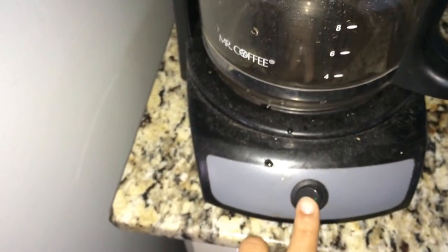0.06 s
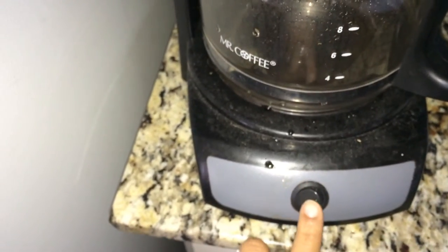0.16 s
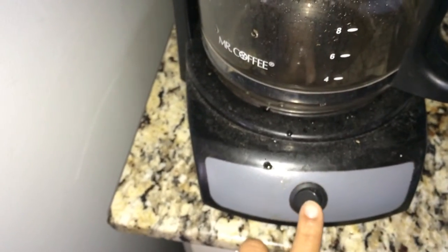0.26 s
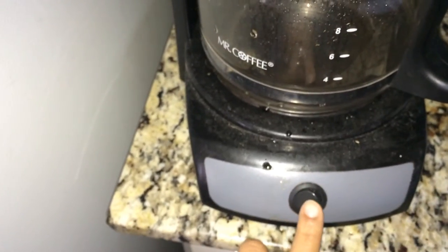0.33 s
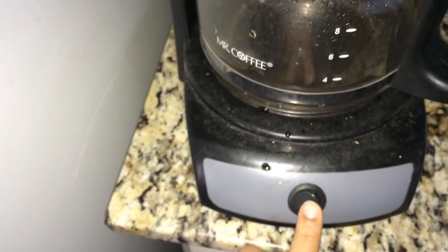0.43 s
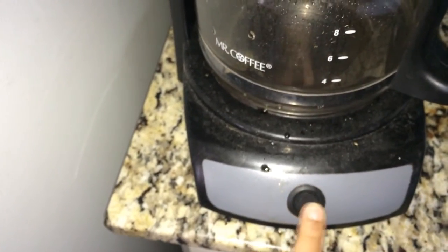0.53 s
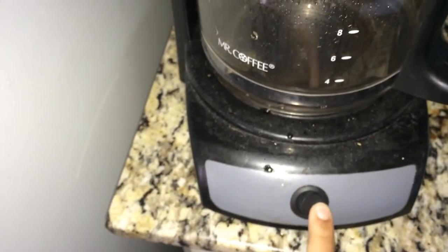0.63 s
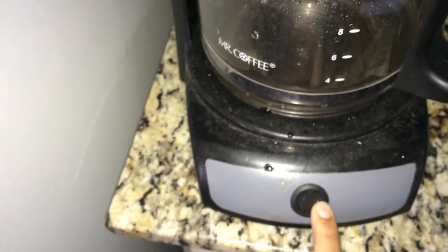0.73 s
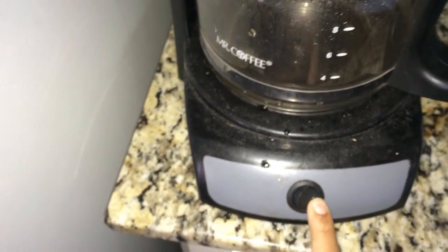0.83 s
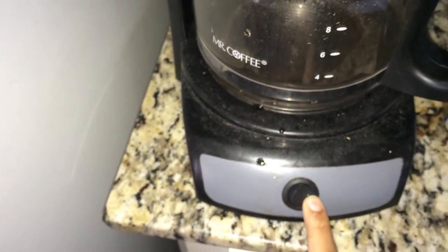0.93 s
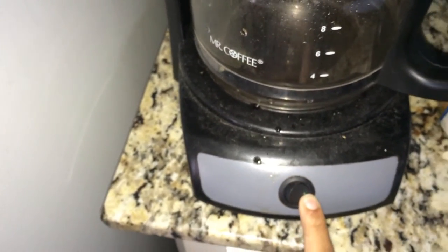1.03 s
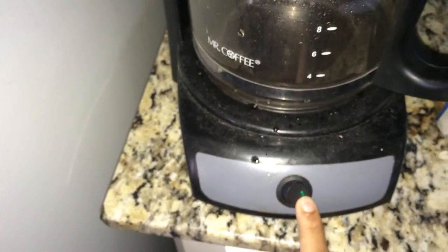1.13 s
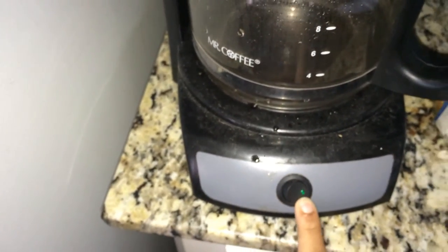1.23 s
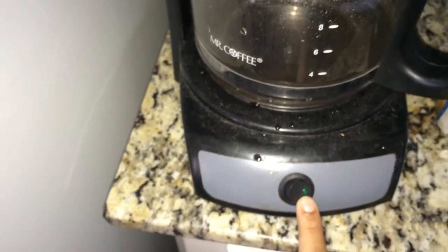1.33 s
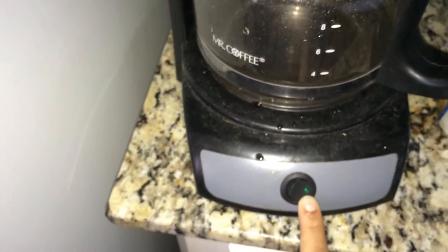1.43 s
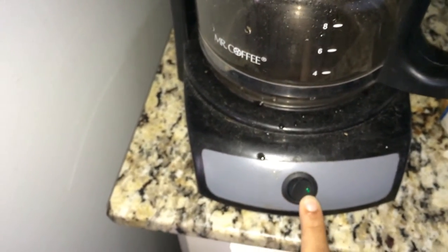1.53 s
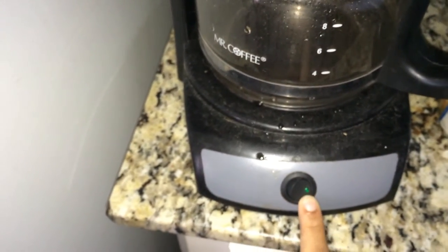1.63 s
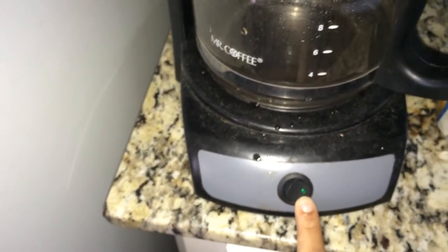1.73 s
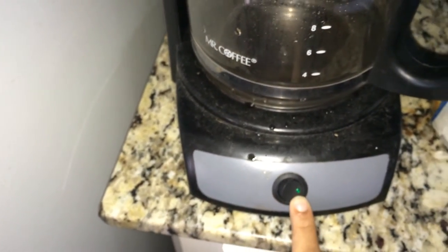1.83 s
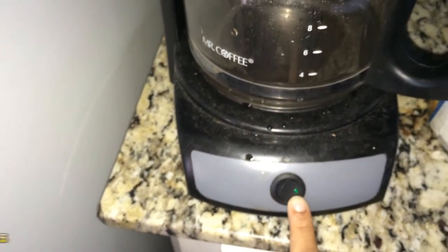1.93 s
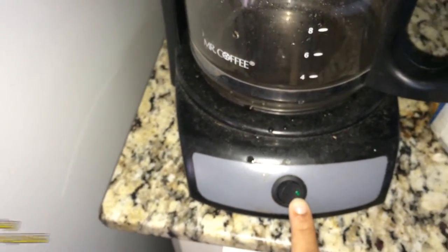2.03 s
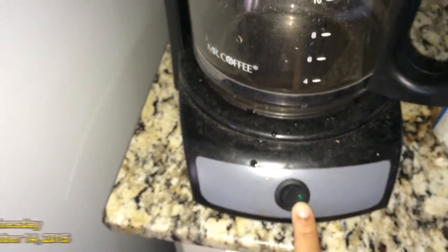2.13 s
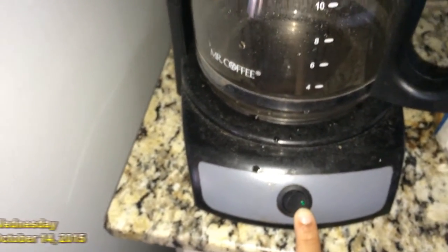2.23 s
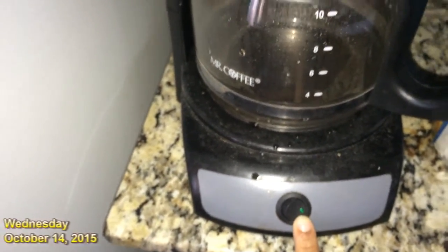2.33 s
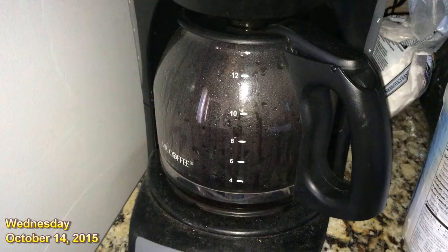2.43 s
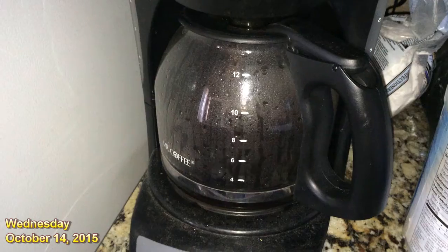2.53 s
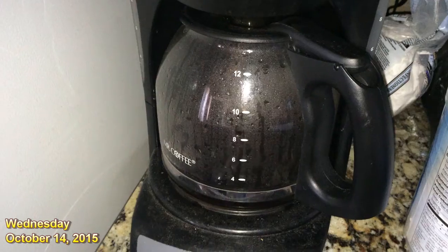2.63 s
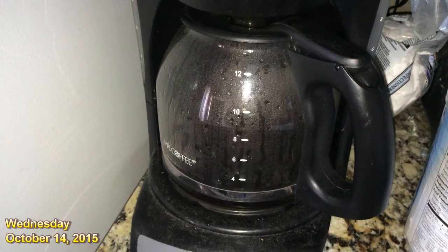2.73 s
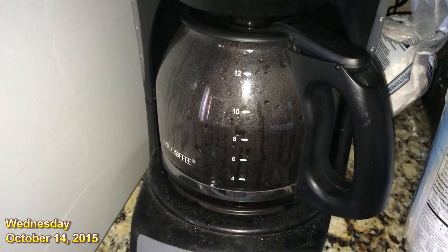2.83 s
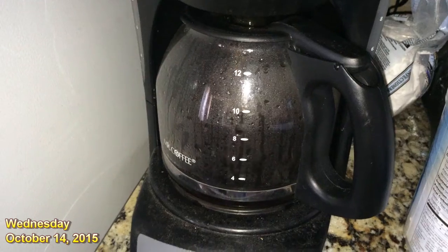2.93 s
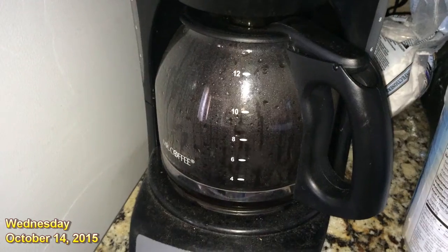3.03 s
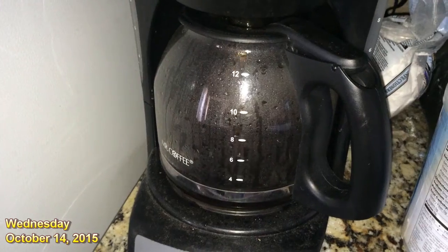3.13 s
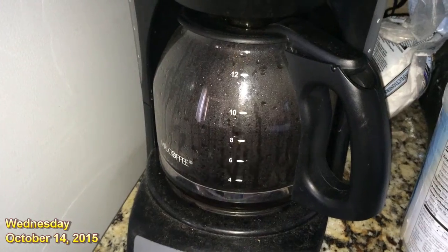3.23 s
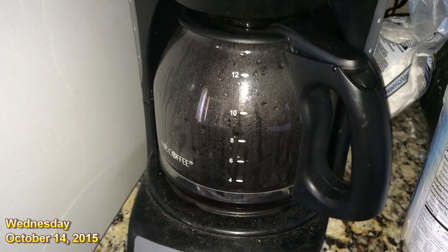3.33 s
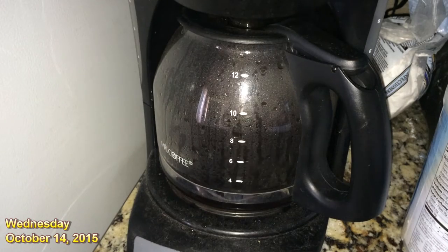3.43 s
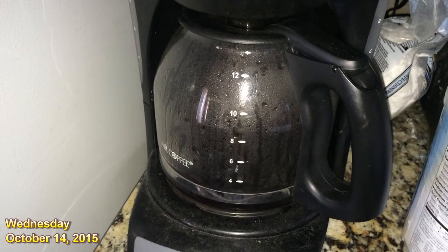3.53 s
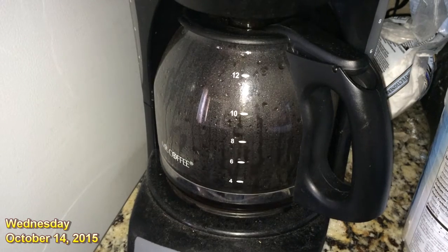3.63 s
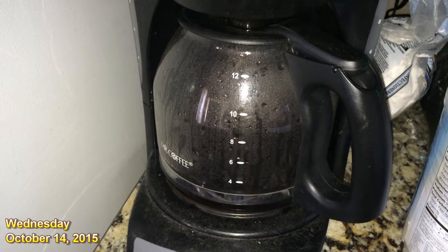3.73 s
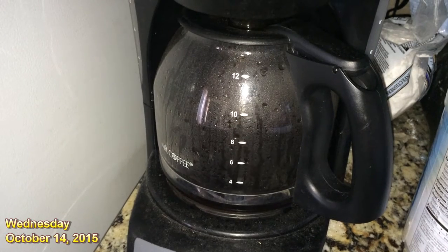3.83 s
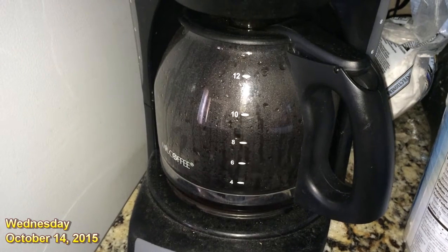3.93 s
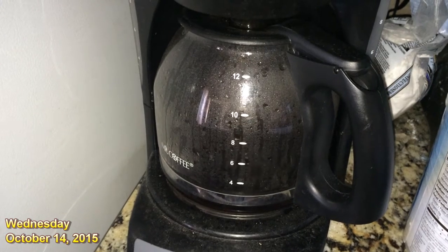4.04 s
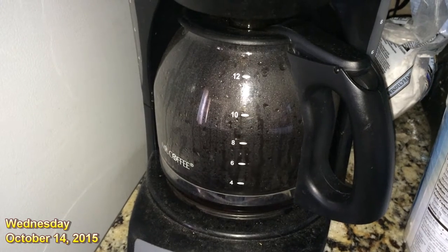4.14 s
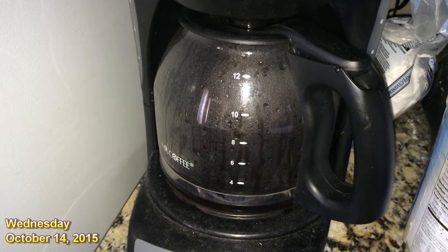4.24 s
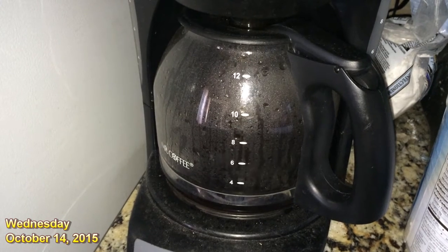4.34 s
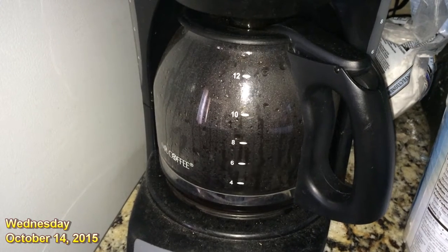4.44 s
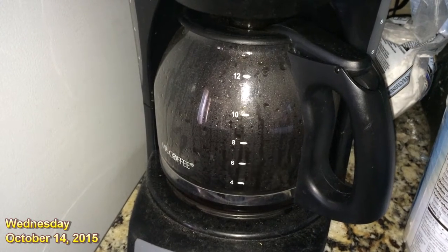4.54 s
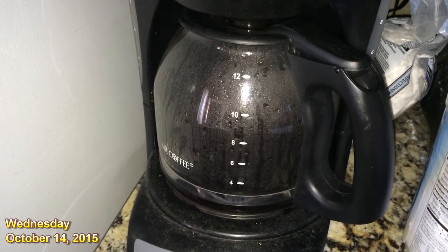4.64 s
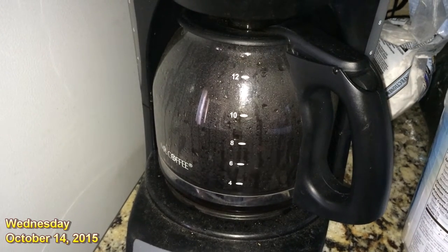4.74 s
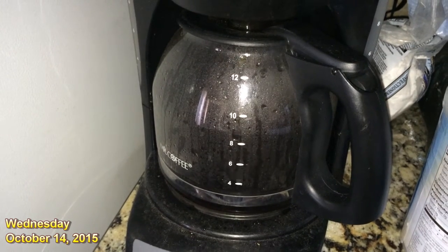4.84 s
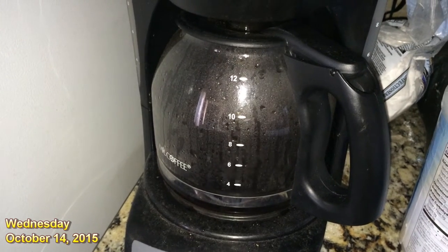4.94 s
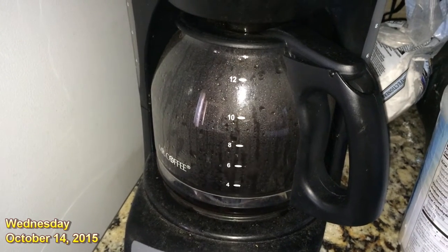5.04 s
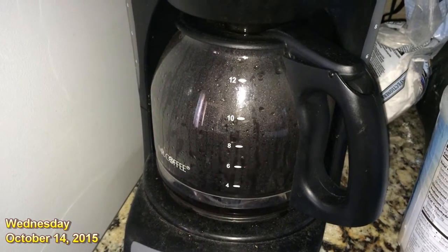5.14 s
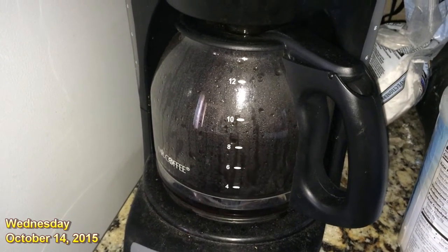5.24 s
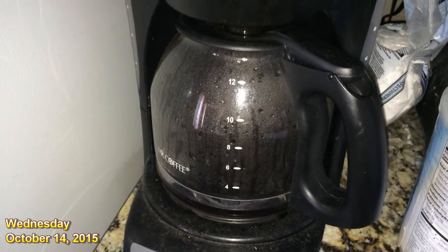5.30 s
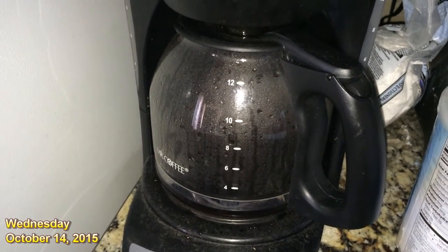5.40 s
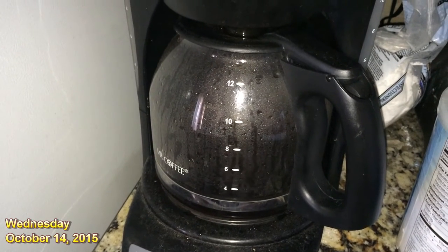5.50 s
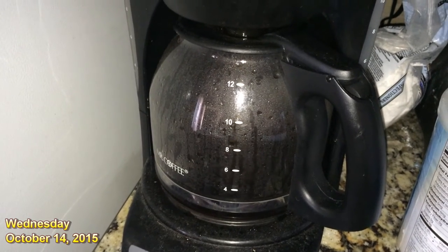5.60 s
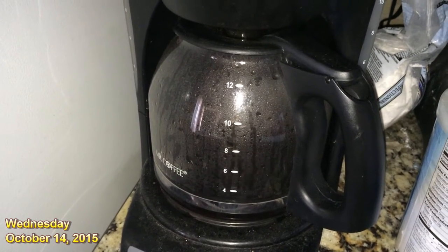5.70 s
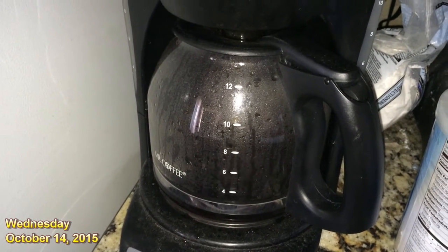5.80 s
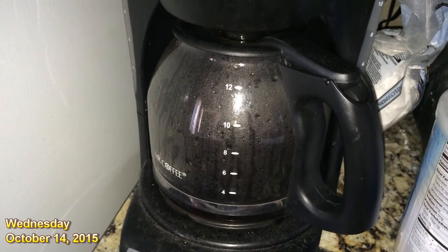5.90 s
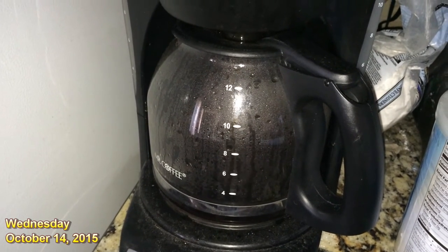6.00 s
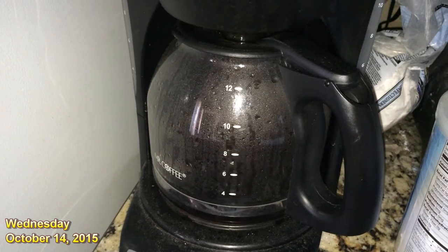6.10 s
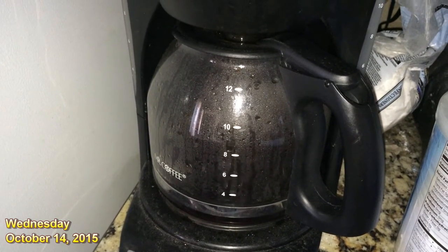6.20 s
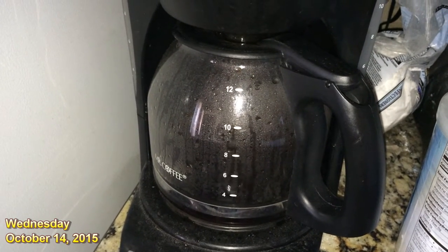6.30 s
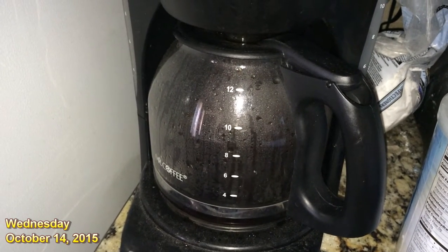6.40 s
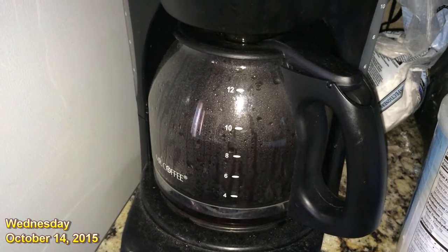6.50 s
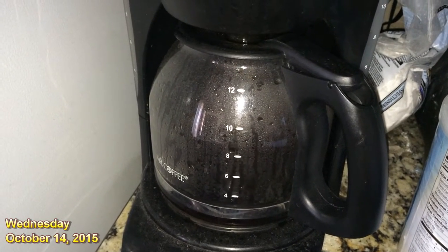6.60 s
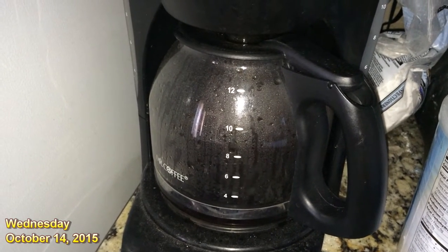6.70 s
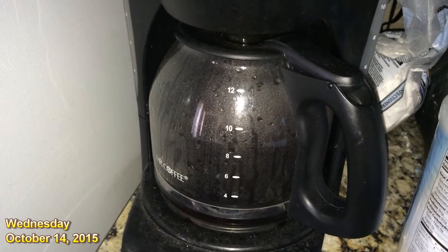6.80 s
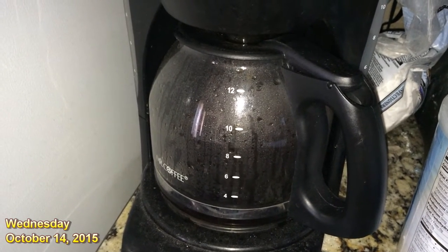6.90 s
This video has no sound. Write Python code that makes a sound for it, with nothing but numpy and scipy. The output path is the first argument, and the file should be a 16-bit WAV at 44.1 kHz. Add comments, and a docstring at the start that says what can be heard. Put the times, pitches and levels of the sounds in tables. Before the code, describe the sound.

Plastic rocker switch clicks over quiet appliance hum; a tiny gap, then a drip brewer plips, sizzles and belches bubbling water into a glass carafe.

```python
"""A humming kitchen, with a drip coffee maker heard close up and a little microphone hiss. Its rocker switch
snaps on; then, after a brief gap of silence, the scene changes to the brew under way. Shaped noise makes the
hiss of water flashing to steam in the heater, trains of tiny clicks ring the riser tube and plastic housing as
slugs of water gurgle and boom, and swelling sines plip as drops fall into the glass carafe."""
import sys
import numpy as np
from scipy import signal
from scipy.fft import rfft, irfft
from scipy.io import wavfile

SR = 44100
rng = np.random.default_rng(int(sys.argv[2]) if len(sys.argv) > 2 else 0)


def store_pcm(level_fs):
    """Save levels as 16-bit WAV."""
    pcm = np.round(np.clip(level_fs, -1, 1) * 32767).astype(np.int16)
    wavfile.write(sys.argv[1], SR, np.atleast_2d(pcm).T)


N = 306936
TIME = np.arange(N) / SR
FLASH_S = 3.1748   # water hits the dry heater


def from_db(db):
    """Decibels to gain."""
    return 10 ** (np.asarray(db) / 20)


def rms_one(x):
    """Scale to unit power."""
    return x / np.sqrt(np.mean(x ** 2) + 1e-20)


def add(out, s, sound):
    """Mix a short sound in at a time in seconds."""
    i = int(round(s * SR))
    out[i:i + len(sound)] += sound[:N - i]


def drift(per_s):
    """Smooth chance with spread 1, led by so many random points per second."""
    knots = rng.standard_normal(4096)
    return rms_one(np.interp(TIME * per_s, np.arange(len(knots)), knots))


def colour(x, points):
    """Shape a steady sound to a spectrum, falling 24 dB per octave beyond its end points; rms 1."""
    hz, db = np.transpose(points)
    f = np.maximum(np.fft.rfftfreq(N, 1 / SR), 1)
    octaves_outside = np.maximum(np.log2(hz[0] / f), 0) + np.maximum(np.log2(f / hz[-1]), 0)
    gain = from_db(np.interp(np.log(f), np.log(hz), db) - 24 * octaves_outside)
    return rms_one(irfft(rfft(x) * gain, N))


def resonate(x, peaks):
    """Parallel resonances of (Hz, width in Hz, dB), signs alternating."""
    out = np.zeros(len(x))
    for k, (hz, width, db) in enumerate(peaks):
        r = np.exp(-np.pi * width / SR)
        poles = [1, -2 * r * np.cos(2 * np.pi * hz / SR), r * r]
        gain = (-1) ** k * from_db(db) * (1 - r * r) / 2
        out += gain * signal.lfilter([1, 0, -1], poles, x + 1e-18)
    return out


def grains(per_s, spread_db, size=N):
    """Random tiny clicks of uneven size; rms 1."""
    sizes = from_db(spread_db * np.minimum(rng.exponential(1, size), 4)) * rng.choice([-1, 1], size)
    return rms_one(sizes * (rng.random(size) < per_s / SR))


def swell(s, length, rise, fall):
    """A gain that rises from s, holds for a length and dies away, all in seconds."""
    t = np.maximum(TIME - s, 0)
    return (1 - np.exp(-t / rise)) * np.exp(-np.clip((t - length) / fall, 0, 50))


def dying(clicks, t60):
    """Envelope of a diffuse sound that every click refreshes."""
    return np.sqrt(signal.lfilter([1], [1, -from_db(-120 / (t60 * SR))], clicks ** 2 + 1e-20))


def plop(hz, cycles, glide):
    """A bubble swells to height 1 over a few cycles and dies away, rising a little in pitch."""
    t = TIME[:SR // 5]
    age = t * hz / max(cycles, .5)
    pitch_rise = 1 + glide * (np.minimum(age, 4) - 1)
    return age ** 2 * np.exp(2 * (1 - age)) * np.sin(2 * np.pi * hz * t * pitch_rise)


def flurry(shape, body, per_s):
    """Small collapses under an envelope ring a body, which gives back the envelope's energy."""
    collapses = grains(per_s, spread_db=0.5, size=len(shape)) * shape
    return rms_one(resonate(collapses, body)) * np.sqrt(np.mean(shape ** 2))


# The gap of silence where the scene changes, in a single row: start in seconds, end in seconds.
GAP = (2.497, 2.607)


def brew_time(share):
    """The moment at a share 0-1 of the brew."""
    return GAP[1] + share * (TIME[-1] - GAP[1])


# Quiet kitchen around the machine. Each row: frequency in Hz, relative level in dB per Hz.
ROOM_COLOUR = [(15, -59), (25, -35), (50, -9.5), (90, -17), (109, -2.5), (129, -1.5), (145, -15), (169, -6),
               (252, -11), (288, -6.5), (439, -15), (473, -9), (562, -20.5), (1210, -22), (2400, -38.5),
               (3120, -72.5), (5280, -120)]
# The microphone's own hiss. Each row: frequency in Hz, relative level in dB per Hz.
MIC_HISS = [(1410, -33.5), (2400, -3.5), (3570, -3.5), (3830, -4), (5320, -8.5), (5980, -4), (7560, -5),
            (15500, -15.5)]


def room_floor(room_db=-51, hiss_db=-72):
    """Steady noise shaped as room rumble, plus the thin hiss of the microphone."""
    room = from_db(room_db) * colour(rng.standard_normal(N), ROOM_COLOUR)
    return room + from_db(hiss_db) * colour(rng.standard_normal(N), MIC_HISS)


# Appliance hum before the brew. Each row: frequency in Hz, rms level in dB.
HUM_IDLE = [(118.4, -60), (177.6, -59.5), (290.7, -60.5), (355.3, -65), (473.7, -60), (947.5, -72.5),
            (1184, -69), (1244, -71), (3494, -86), (7343, -86.5)]
# Appliance hum during the brew. Each row: frequency in Hz, rms level in dB before the brew's hum gain.
HUM_BREW = [(118.4, -52), (177.6, -55.5), (290.7, -57), (473.7, -57.5)]


def hum(lines, waver):
    """Motor and mains tones whose phase wavers slightly, by a spread in radians."""
    return sum(from_db(db) * np.sqrt(2) * np.sin(2 * np.pi * hz * TIME + waver * drift(7)) for hz, db in lines)


def kitchen(x, wet_db, t60_low=0.26, t60_high=0.22):
    """A short diffuse tail, the treble dying first."""
    t, noise = TIME[:SR // 2], rng.standard_normal(SR // 2)
    low = signal.sosfilt(signal.butter(2, 3000, fs=SR, output="sos"), noise)
    high = from_db(-8.5) * signal.sosfilt(signal.butter(2, 3000, "high", fs=SR, output="sos"), -noise)
    tail = low * np.exp(-np.log(1000) * t / t60_low) + high * np.exp(-np.log(1000) * t / t60_high)
    tail *= (t > .003) * (1 + 13.0 * np.exp(-t / 0.0024))   # counter and wall answer first
    return x + from_db(wet_db) * signal.fftconvolve(x, tail / np.linalg.norm(tail))[:N]


# Rumble of hot water in the machine. Each row: frequency in Hz, relative level in dB per Hz.
SIMMER_COLOUR = [(15, -56), (25, -19), (86, -8), (119, -0.5), (216, -7.5), (283, -2.5), (386, -11),
                 (477, -10.5), (601, -16.5), (715, -11.5), (1460, -20.5), (1840, -19), (2020, -32),
                 (2360, -23.5), (2500, -25), (3250, -94), (5500, -120)]
# Air in the carafe, rung by the simmer and by the drops. Each row: frequency in Hz, width in Hz, level in dB.
CARAFE = [(1372, 22, -9), (1530, 14, 5), (1897, 25, -2), (2415, 30, -4), (2777, 25, -3), (3005, 22, -1)]
SIMMER_IDLE_DB, SIMMER_SURGE_DB = -47.5, -39   # swells just ahead of the flash and slowly settles
SIMMER_LEAD_S, SIMMER_RISE_S, SIMMER_HOLD_S, SIMMER_FALL_S = 0.25, 0.14, 0.82, 1.06


def simmer(rumble_db=-2.0, bubbles_db=-17):
    """Low lumpy rumble of hot water, with small bubbles ringing in the carafe."""
    lumps = from_db(rumble_db + 0.69 * drift(25))
    rumble = lumps * colour(grains(3000, spread_db=2.5), SIMMER_COLOUR)
    bubbles = from_db(bubbles_db) * rms_one(resonate(grains(120, spread_db=1.5), CARAFE))
    surge = swell(FLASH_S - SIMMER_LEAD_S, SIMMER_HOLD_S, SIMMER_RISE_S, SIMMER_FALL_S)
    return (from_db(SIMMER_IDLE_DB) + from_db(SIMMER_SURGE_DB) * surge) * (rumble + bubbles)


# Finger sliding on the panel. Each row: start in seconds, level in dB, length in seconds.
RUBS = [(0.404, -68.5, 0.036), (1.334, -76, .05), (1.958, -58.5, 0.031)]


def finger():
    """Skin drags faintly over plastic, as short swells of shaped noise."""
    rub = colour(rng.standard_normal(N), [(1500, 0), (1900, 6.0), (3000, -4), (4800, -6), (5600, -18)])
    return rub * sum(from_db(db) * swell(s, length, rise=.002, fall=0.025) for s, db, length in RUBS)


# The rocker creaks, snaps over and is let go. Each row: start in seconds, relative level in dB.
SWITCH = [(0.6879, -25.5), (0.706, -36.5), (0.7135, -29), (0.726, -34.5), (0.748, 5.5), (0.948, -48)]
# Every contact bounces twice. Each row: delay in seconds, level in dB.
BOUNCES = [(0, -1), (0.0009, -10), (0.0023, -9.5)]
# Crack of the contacts. Each row: frequency in Hz, relative level in dB per Hz.
SWITCH_COLOUR = [(200, -21.5), (350, -7), (600, -20), (1400, 2.5), (2300, -8), (3600, 2), (5000, -10.5),
                 (6500, -3.5), (9000, -7), (13000, -13.5), (15000, -22.5)]
# Front panel behind the switch. Each row: frequency in Hz, level in dB, 60 dB decay in seconds.
PANEL = [(395, -27.5, 0.095), (1111, -27, 0.03), (1471, -12.5, 0.039), (2180, -22.5, .015),
         (3830, -22.5, .006), (6270, -18, .01), (8850, -24, .01)]
# The kitchen's answer to the switch. Each row: frequency in Hz, relative level in dB per Hz.
SWITCH_TAIL = [(250, -5), (400, 0), (650, -5), (1400, 1.5), (2500, -5.5), (5000, -7.5), (8500, -8.5),
               (14000, -18.5)]


def switch(crack_db=-8, panel_db=-5, early_db=-23, late_db=-37, low_cut_hz=260):
    """Rocker contacts give a short crack, the ring of the plastic panel, then counter and walls answer."""
    clicks, t = np.zeros(N), TIME[:SR // 5]
    for s, db in SWITCH:
        for delay, bounce_db in BOUNCES:
            add(clicks, s + delay, from_db([db + bounce_db]))
    crack = dying(clicks, t60=0.012) * colour(rng.standard_normal(N), SWITCH_COLOUR)
    ring = sum(from_db(db) * np.sin(2 * np.pi * hz * t) * np.exp(-np.log(1000) * t / t60)
               for hz, db, t60 in PANEL)
    panel = signal.fftconvolve(clicks, ring)[:N]
    tail_level = from_db(early_db) * dying(clicks, t60=0.034) + from_db(late_db) * dying(clicks, t60=0.22)
    tail = tail_level * colour(rng.standard_normal(N), SWITCH_TAIL)
    snap = from_db(crack_db) * crack + from_db(panel_db) * panel + tail
    # a small part radiates no bass
    return signal.sosfilt(signal.butter(2, low_cut_hz, "high", fs=SR, output="sos"), snap)


# Crack and jet of the flash in the heater. Each row: frequency in Hz, relative level in dB per Hz.
FLASH_COLOUR = [(530, -19), (900, -15), (1120, -37), (1320, -20), (1690, -12.5), (1950, -7.5), (2630, -15),
                (4820, -2.5), (5700, -13), (6730, -7.5), (11800, -15), (13600, -13.5), (15500, -20)]
# Slots of the lid that the jet whistles through. Each row: frequency in Hz, width in Hz, level in dB.
SLOTS = [(3760, 94, -18), (4150, 100, 16), (4500, 70, -10), (4670, 52, 16), (4600, 35, -6), (4810, 59, 15)]
# Long sizzle of the steam. Each row: frequency in Hz, relative level in dB per Hz.
STEAM_COLOUR = [(940, -45), (1600, -16), (1850, -5.5), (2030, -7), (3140, -14), (3980, -2.5), (4340, -10),
                (4910, -4), (5500, -7.5), (6980, 4), (7530, -1.5), (10200, -2.5), (11200, -8), (14200, -6),
                (15500, -10.5)]
# Vent resonances. Each row: frequency in Hz, width in Hz, level in dB.
STEAM_PEAKS = [(3250, 460, 13), (3820, 21, 18), (4270, 31, -4), (4806, 580, 20), (6310, 290, 19.5),
               (7740, 58, -16), (9400, 660, -1)]
STEAM_IDLE_DB, STEAM_SURGE_DB = -55, -48   # steam leaks all along and surges with the flash
STEAM_RISE_S, STEAM_HOLD_S, STEAM_FALL_S = 0.066, 1.79, 0.78


def steam(crack_db=-14, sputter_db=-29, jet_db=-36, slots_db=-5, vent_db=-4):
    """A sharp crack, a sputter and a dying jet as water flashes to steam, and a long fine sizzle at the vent."""
    burst = swell(FLASH_S, 0.0031, rise=0.00017, fall=0.0014)
    crack = from_db(crack_db) * burst * colour(rng.standard_normal(N), FLASH_COLOUR)
    flow = from_db(sputter_db) * swell(FLASH_S, 0.017, rise=0.0017, fall=0.039)
    flow = flow + from_db(jet_db) * swell(FLASH_S, 0.25, rise=0.012, fall=0.21)
    flow = flow * from_db(0.6 * drift(45))   # the jet sputters
    coarse = grains(7600, spread_db=1.5)
    whistle = from_db(slots_db) * rms_one(resonate(coarse, SLOTS))
    jet = flow * rms_one(colour(coarse, FLASH_COLOUR) + whistle)
    sizzle = colour(grains(16000, spread_db=4.0), STEAM_COLOUR)
    vent = from_db(vent_db) * rms_one(resonate(rng.standard_normal(N), STEAM_PEAKS))
    escape = from_db(STEAM_IDLE_DB)
    escape = escape + from_db(STEAM_SURGE_DB) * swell(FLASH_S, STEAM_HOLD_S, STEAM_RISE_S, STEAM_FALL_S)
    return crack + jet + from_db(.5 * drift(30)) * escape * rms_one(sizzle + vent)


# The loudest spits on hot metal. Each row: start in seconds, relative level in dB, pitch in Hz.
SPITS = [(2.8756, -36.5, 7400), (2.958, -33, 6730), (3.0016, -36.5, 8400), (3.0345, -30.5, 8500),
         (3.9494, -29.5, 7200), (4.7825, -28.5, 12000), (4.9557, -28.5, 6800), (5.055, -28.5, 6950),
         (5.179, -28, 8600), (5.608, -30.5, 7640), (5.894, -33, 7000), (6.141, -21, 10100),
         (6.535, -38.5, 10100), (6.6288, -37.5, 9300)]
FAINT_SPIT_DB, FAINT_SPIT_HZ = -43, (7000, 10200)   # the others come at random


def spits(width_hz=1500, decay_s=0.011, spit_db=-7.5, hiss_share=0.087, count=9):
    """Droplets fizz away on hot metal in short bright bursts of resonant noise."""
    out, t = np.zeros(N), TIME[:SR // 10]
    faint = [(brew_time(when), FAINT_SPIT_DB, np.interp(pitch, [0, 1], FAINT_SPIT_HZ))
             for when, pitch in rng.random((count, 2))]
    noises = rng.standard_normal((len(SPITS) + count, len(t)))
    for (s, db, hz), noise in zip(list(SPITS) + faint, noises):
        fizz = rms_one(resonate(noise, [(hz, width_hz, 0)]) + hiss_share * np.diff(noise, prepend=0))
        add(out, s - .001, from_db(db + spit_db) * fizz * np.exp(-t / decay_s))
    return out


def drop_cycles(hz):
    """Cycles to full swing: small high bubbles take more of them."""
    return 0.87 + 0.00068 * hz


def droplets(count=22, level_db=-53, spread_db=8):
    """Faint small bubbles burst at random between the big drops."""
    out = np.zeros(N)
    for when, pitch, size in rng.random((count, 3)):
        hz = 1200 * 2.8 ** pitch
        add(out, brew_time(when), from_db(level_db + spread_db * size) * plop(hz, drop_cycles(hz), glide=0.015))
    return out


# Drops falling into the carafe. Each row: start in seconds, level of the bubble in dB, pitch in Hz.
DROPS = [(2.615, -29.5, 1093), (2.644, -22.5, 1422), (2.959, -20, 3110), (3.045, -34, 1020),
         (3.415, -27.5, 1361), (3.474, -13, 1050), (3.561, -22, 2040), (4.519, -25.5, 2000),
         (4.721, -16, 1184), (4.792, -23, 2740), (5.129, -23.5, 1357), (5.177, -25.5, 2960),
         (5.227, -36.5, 2280), (5.369, -32.5, 4100), (5.427, -36, 1620), (5.688, -32.5, 1880),
         (5.801, -35.5, 2140), (5.875, -21, 2413), (6.038, -39.5, 2210), (6.082, -19, 1165),
         (6.187, -33.5, 2320), (6.525, -24.5, 1638), (6.552, -30.5, 890), (6.586, -23.5, 1840),
         (6.745, -19, 1550), (6.786, -26, 2283), (6.82, -27.5, 2740)]


def drops(tick_db=-8, tick_db_per_octave=7.0, echo_s=0.0054, echo_db=-8, ring_db=-15, ring_s=0.016,
          near_pitch_db=-3, near_pitch_ratio=0.98, near_pitch_width_hz=600):
    """Each drop splashes and traps a ringing bubble; high ones tick more. The carafe echoes and rings on."""
    out, t = np.zeros(N), TIME[:SR // 5]
    ticks = rng.standard_normal((len(DROPS), len(t))) * np.exp(-t / 0.009)
    for (s, db, hz), tick in zip(DROPS, ticks):
        near_pitch = (near_pitch_ratio * hz, near_pitch_width_hz, near_pitch_db)
        splash = resonate(tick, [(2130, 1100, -1), (3850, 500, 0), near_pitch])
        splash = splash * from_db(tick_db + tick_db_per_octave * np.log2(hz / 2000))
        bubble = plop(hz, drop_cycles(hz), glide=0.007)
        ring = from_db(ring_db) * np.sin(2 * np.pi * hz * t) * np.exp(-t / ring_s)
        add(out, s, from_db(db) * (bubble + ring + splash))
    echo = np.interp(TIME - echo_s, TIME, out)
    return out + from_db(echo_db) * echo + resonate(out, CARAFE)


# Resonances of the housing, shared with the gurgle. Each row: frequency in Hz, width in Hz, level in dB.
HOUSING = [(55.6, 37, -23), (120.7, 26, -4.5), (196.6, 5.3, -4.5), (229, 7.4, 5), (341.6, 12.8, -3.5)]
# Resonances of the riser tube, shared with the gurgle. Each row: frequency in Hz, width in Hz, level in dB.
TUBE = [(625, 17.7, 3.5), (750, 420, -11.5), (1030, 157, -6.5), (1258, 22, -2.5), (1356, 74, -2.5),
        (1430, 190, -11.5)]
BURBLE_DB, BURBLE_PER_S = -41.5, 64
BURBLE_DELAY_S, BURBLE_HOLD_S = 0.39, 0.97   # counted from the flash


def burble(housing_db=-6.0):
    """While water surges up the tube, small bubbles keep tube and housing ringing."""
    pops = grains(BURBLE_PER_S, spread_db=1.5)
    body = rms_one(resonate(pops, TUBE)) + from_db(housing_db) * rms_one(resonate(pops, HOUSING))
    surge = swell(FLASH_S + BURBLE_DELAY_S, BURBLE_HOLD_S, rise=0.045, fall=0.057)
    return from_db(BURBLE_DB) * surge * rms_one(body)


# Belches of water and steam, each a quick run of gulps. Each row: start in seconds, length in seconds,
# throat level in dB, boom level in dB, slug pitch in Hz.
BELCHES = [(2.722, 0.03, -33.5, -46.5, 347), (2.781, 0.011, -49, -54.5, 333),
           (2.807, 0.045, -45, -50.5, 223), (2.991, 0.02, -35.5, -33, 232),
           (3.062, 0.016, -46.5, -61.5, 225), (3.104, 0.02, -43, -55.5, 228), (3.312, 0.021, -35, -30, 344),
           (3.494, 0.07, -45, -32.5, 325), (3.562, 0.019, -29.5, -22, 211.6), (3.649, 0.053, -24, -25, 331),
           (3.718, 0.023, -30, -20.5, 236), (3.776, 0.039, -29.5, -21.5, 177),
           (3.839, 0.037, -25.5, -23, 230), (3.882, .036, -21, -22, 320), (3.921, 0.0274, -26, -21, 201),
           (4.02, 0.017, -28, -22, 220.1), (4.057, 0.039, -34, -26.5, 229),
           (4.113, 0.02998, -24, -25.5, 327), (4.23, 0.062, -36, -23.5, 188),
           (4.317, 0.054, -27, -27.5, 334), (4.431, 0.035, -28, -28.5, 330.2), (4.49, 0.035, -31, -30, 344),
           (6.631, 0.013, -33.5, -39, 317), (6.71, .038, -32, -39.5, 345), (6.805, 0.015, -33.5, -35, 213)]
GULP_S, GULP_DUTY = .02, .7   # spacing of gulps and sounding share of it
GULP_JITTER_S, GULP_SCATTER_DB = .0008, 0.6
# a bubble fills the tube; with less water (boom) it is smaller and higher
BUBBLE_HZ, FULL_BORE_DB, BUBBLE_HZ_PER_DB = 614, -33.5, 33.5
THROAT_RISE_DB, BOOM_RISE_DB = 2.5, -2   # over a belch the throat grows and the boom shrinks
SPLASH_DB, SPLASH_FOLLOWS, DRY_SPRAY = -22, 0.5, 0.4   # spray grows more slowly than throat; dry belches spray more
SLUG_SAG, PITCH_SCATTER = .12, 0.031   # share by which the slug's pitch sinks; chance spread of pitch


def gulps():
    """Split each belch into gulps: (s, boom dB, throat dB, splash dB, length s, slug Hz, bubble Hz)."""
    for start, length, throat_db, boom_db, slug_hz in BELCHES:
        count = max(1, round(length / GULP_S))
        bubble_hz = BUBBLE_HZ + BUBBLE_HZ_PER_DB * max(FULL_BORE_DB - boom_db, 0)
        luck = rng.standard_normal((16, 5))[:count]
        for k, (late, throat_luck, boom_luck, slug_luck, bubble_luck) in enumerate(luck):
            s = start + k * length / count + GULP_JITTER_S * late * (k > 0)
            progress = (k + .5) / count - .5
            throat = throat_db + THROAT_RISE_DB * progress + GULP_SCATTER_DB * throat_luck
            boom = boom_db + BOOM_RISE_DB * progress + GULP_SCATTER_DB * boom_luck
            splash = SPLASH_DB + SPLASH_FOLLOWS * throat + DRY_SPRAY * (throat - boom)
            slug = slug_hz * (1 - SLUG_SAG * progress + PITCH_SCATTER * slug_luck)
            bubble = bubble_hz * (1 + PITCH_SCATTER * bubble_luck)
            yield s, boom, throat, splash, GULP_DUTY * length / count, slug, bubble


# Resonances of the spray head. Each row: frequency in Hz, width in Hz, level in dB.
SPRAY = [(1684, 180, 8.5), (2000, 300, 9), (2210, 240, 10.5), (2770, 100, -15), (2845, 78, 4),
         (3000, 1660, -2.5), (3900, 54, -3)]
# The nozzle squeals under the hardest gulps. Each row: frequency in Hz, width in Hz, level in dB.
NOZZLE = [(3380, 300, 0)]
NOZZLE_DB, NOZZLE_FOLLOWS = 11, 2.15   # its level, and the dB it gains per dB of throat


def gurgle(slug_db=-3.0, bubble_db=5.0, housing_db=0.0, tube_db=-1.5, spray_db=-3.5, bubble_width_hz=55):
    """Each gulp: a slug thuds, a big bubble plops, small collapses drive housing, tube, spray head and nozzle."""
    t, out = TIME[:SR // 5], np.zeros(N)
    for s, boom_db, throat_db, splash_db, length, slug_hz, bubble_hz in gulps():
        shape = (1 - np.exp(-t / 0.00062)) * np.exp(-np.maximum(t - length, 0) / 0.0025)
        tube = TUBE + [(bubble_hz, bubble_width_hz, -3)]   # the trapped bubble adds a resonance of its own
        boom = from_db(slug_db) * plop(slug_hz, cycles=slug_hz * length * 1.17, glide=0.0064)
        boom = boom + from_db(housing_db) * flurry(shape, HOUSING, per_s=1100)
        throat = from_db(bubble_db) * plop(bubble_hz, cycles=bubble_hz * length * 0.41, glide=0.006)
        throat = throat + from_db(tube_db) * flurry(shape, tube, per_s=900)
        splash = from_db(spray_db) * flurry(shape, SPRAY, per_s=630)
        squeal = from_db(NOZZLE_DB + NOZZLE_FOLLOWS * throat_db) * flurry(shape, NOZZLE, per_s=920)
        add(out, s - .001, from_db(throat_db) * throat + from_db(splash_db) * splash + squeal)
        add(out, s + 0.00099, from_db(boom_db) * boom)   # water lands just after the steam breaks through
    return out


def scene(brew_hum_db=1.5, brew_floor_db=5.0):
    """Switching on, then a brief gap of silence as the scene changes to the brew over a louder floor."""
    floor = room_floor()
    idle = switch() + finger() + hum(HUM_IDLE, waver=0.31)
    machine = gurgle() + burble() + drops() + droplets() + spits() + steam()
    brew = kitchen(machine, wet_db=-15.0) + simmer() + from_db(brew_hum_db) * hum(HUM_BREW, waver=0.76)
    before = (idle + floor) * (TIME < GAP[0])
    after = (brew + from_db(brew_floor_db) * floor) * (TIME > GAP[1])
    return (before + after)[None]


def record(dry, cutoff_hz=15300):
    """Full scale limits the peaks, then a steep low-pass cuts the top."""
    return signal.sosfilt(signal.ellip(10, .2, 80, cutoff_hz, fs=SR, output="sos"), np.clip(dry, -1, 1))


dry = scene()
out = record(dry)
store_pcm(out)
```